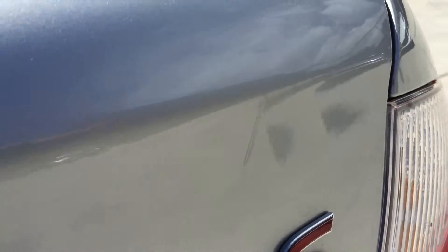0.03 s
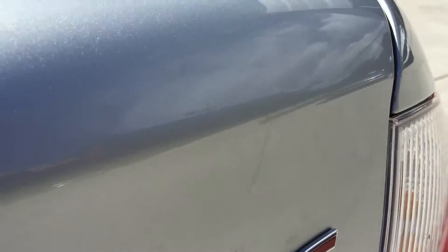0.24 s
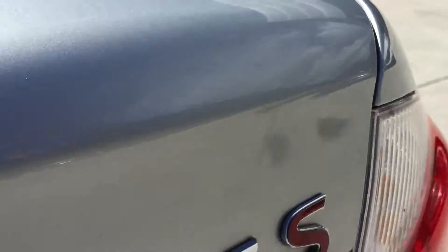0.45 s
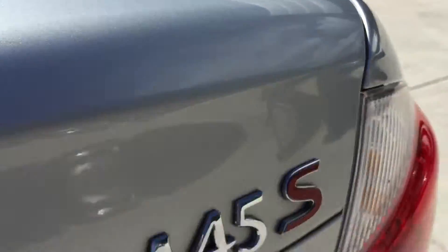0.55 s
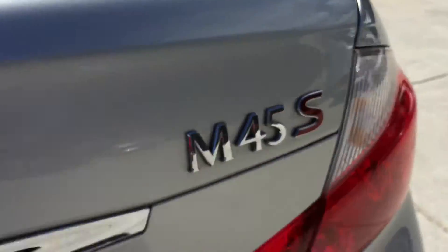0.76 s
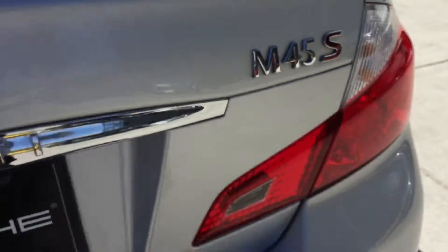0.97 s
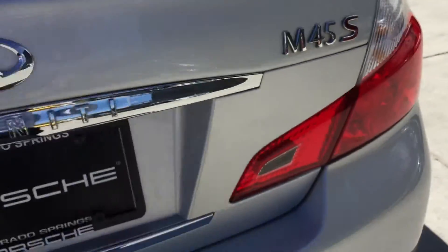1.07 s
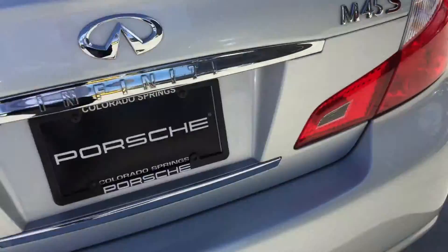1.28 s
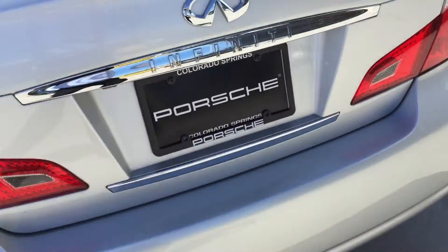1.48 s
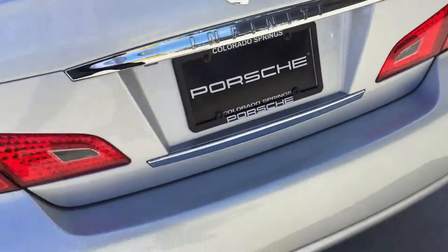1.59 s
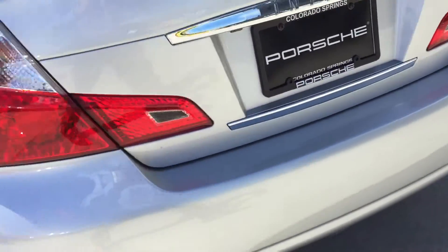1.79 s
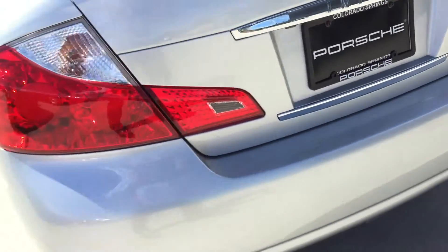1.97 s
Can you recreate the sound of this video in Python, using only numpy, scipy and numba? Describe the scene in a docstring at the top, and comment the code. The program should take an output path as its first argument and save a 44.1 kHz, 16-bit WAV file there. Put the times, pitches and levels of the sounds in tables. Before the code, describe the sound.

Strong gusting wind buffets the microphone outdoors, rumbling and snapping, then eases before a last puff

```python
"""Two seconds of wind buffeting a microphone in an open car park, over smooth filtered-noise traffic.
Strong gusts open at once: low-passed eddy noise rumbles, and faster air opens the treble of each puff.
Short whips of air snap throughout; a tick of shoe grit comes before the thuds that crowd around 1 s.
Then the wind eases, with more ticks and noise scuffs, until a last sharp whip and puff near 1.9 s.
Gain control ducks the quiet sounds under the gusts."""
import sys
import numpy as np
from scipy import signal
from scipy.fft import rfft, irfft
from scipy.io import wavfile
from scipy.ndimage import uniform_filter1d
from numba import njit

SR = 44100
rng = np.random.default_rng(int(sys.argv[2]) if len(sys.argv) > 2 else 0)


def natural_amplitude(level_db):
    """Convert a level in decibels to a linear amplitude factor, elementwise."""
    exponent = np.asarray(level_db, float) / 20
    return 10 ** exponent


def transcribe(u):
    """Save the signal u as a 16-bit wav file named by the first command-line argument.

    u: samples, shape (n,) or (channels, n), limited to [-1, 1]; the rate is SR.
    q: integer samples, one column per channel.
    """
    v = np.clip(np.atleast_2d(u).T, -1, 1)
    q = np.round(v * 32767).astype(np.int16)
    wavfile.write(sys.argv[1], SR, q)


N = 89522
T = np.arange(N) / SR  # seconds


def level(x, db):
    """Set the rms in dB."""
    return x * natural_amplitude(db) / np.sqrt(np.mean(x ** 2))


def coloured(points):
    """Noise of rms 1, shaped by a (Hz, relative dB) spectrum."""
    hz, db = np.array(points, float).T
    bin_hz = np.maximum(np.arange(N // 2 + 1) * SR / N, 1)
    curve_db = np.interp(np.log(bin_hz), np.log(hz), db)
    return level(irfft(rfft(rng.standard_normal(N)) * natural_amplitude(curve_db), N), 0)


def walk(rate_hz):
    """Random drift through rate_hz new values a second, smoothed; spread near 1."""
    knots = rng.standard_normal(1000)
    drift = np.interp(T * rate_hz, np.arange(len(knots)), knots)
    return 1.118 * uniform_filter1d(drift, int(SR / rate_hz / 2) + 1)


def highpass(x, order, hz):
    """Butterworth bass cut."""
    return signal.sosfilt(signal.butter(order, hz, "high", fs=SR, output="sos"), x)


@njit
def soften(x, hz, order):
    """A chain of one-pole low-passes with a moving corner."""
    y, state = np.empty(len(x)), np.zeros(order)
    for i in range(len(x)):
        a, v = 1 - np.exp(-2 * np.pi * hz[i] / SR), x[i]
        for k in range(order):
            state[k] += a * (v - state[k])
            v = state[k]
        y[i] = v
    return y


@njit
def ring(x, hz, width):
    """State-variable band-pass with a moving centre; width is bandwidth over centre."""
    y, band, low = np.empty(len(x)), 0., 0.
    for i in range(len(x)):
        g = np.tan(np.pi * hz[i] / SR)
        v = (band + g * (x[i] - low)) / (1 + g * (g + width))
        band, low, y[i] = 2 * v - band, low + 2 * g * v, width * v
    return y


@njit
def follow(x, up, down, start):
    """Envelope with separate rise and fall rates per sample."""
    y, e = np.empty(len(x)), start
    for i in range(len(x)):
        e += (x[i] - e) * (up if x[i] > e else down)
        y[i] = e
    return y


# Gusts at the port. Each row: time in seconds, level in dB before WIND_DB,
# air speed in m/s before flutter and whips.
GUSTS = [(0, -17.5, 13.3), (.02, -11, 3), (.048, -14, 7.9), (.064, -6, 5.96), (.10, -11, 9.9),
         (.125, -7.5, 3.7), (.165, -14.5, 5.8), (.19, -16.5, 9.36), (.25, -13.5, 7.45), (.275, -11.5, 8.4),
         (.31, -14.5, 7.96), (.36, -18.5, 10.7), (.40, -15, 8), (.47, -19, 8.04), (.51, -13, 7.37),
         (.57, -14.5, 8.8), (.585, -15, 11.13), (0.633, -11, 10.3), (.655, -13, 11.1), (.688, -20.5, 11.9),
         (.70, -9, 6.6), (.725, -15, 2.7), (.77, -21.5, 9), (.80, -19.5, 3), (.85, -23.5, 2.86),
         (.89, -33, 3.7), (.903, -24, 3.4), (.91, -6.5, 6.9), (.93, -11.5, 7), (.97, -21, 3.4),
         (.985, -7, 11), (1.0, -29, 8.9), (1.015, -15, 9.1), (1.035, -9.5, 4.97), (1.065, -26, 6.7),
         (1.09, -7, 8.05), (1.11, -6, 5.5), (1.14, -13.5, 8.5), (1.168, -23.5, 8), (1.19, -23, 2.6),
         (1.225, -21.5, 2.2), (1.26, -26.5, 3.4), (1.31, -23, 1.75), (1.34, -22, 2.66), (1.39, -33.5, 4),
         (1.445, -17.5, 2.47), (1.48, -31.5, 3.6), (1.535, -12, 6.54), (1.56, -30, 5.6), (1.6, -28, 2),
         (1.655, -16.5, 4.26), (1.7, -28.5, 1.74), (1.78, -26, 2.27), (1.86, -23, 0.83), (1.90, -23, 3.75),
         (1.935, -13, 5.93), (1.97, -16, 4.1), (2.0, -23.5, 3.4), (2.03, -21.5, 6.9)]
# Fast turbulence on the gusts. Each row: new values per second in Hz, speed swing in octaves,
# level swing in dB.
TURBULENCE = [(24.26, 0.092, 1.79), (89.735, 0.19, -0.5), (299.4, 0.23, 2.5)]
WIND_DB = 7.5
KNEE_HZ, KNEE_M_S = 1487, 10.21  # smallest-eddy corner at this air speed, rising in step with it


def gusts():
    """Air speed in octaves over KNEE_M_S, gust level and flutter in dB: turbulence sways both."""
    s, db, speed = np.array(GUSTS, float).T
    octaves = np.log2(np.maximum(np.interp(T, s, speed), .5) / KNEE_M_S)
    gust_db = np.interp(T, s, db) + WIND_DB
    flutter_db = 0
    for rate, swing, swing_db in TURBULENCE:
        sway = walk(rate)
        octaves = octaves + swing * sway
        flutter_db = flutter_db + swing_db * (0.2 * sway + 1.17 * walk(rate))  # mostly independent
    return octaves, gust_db, flutter_db


# Sudden whips of fast air. Each row: start in seconds, strength in dB, length in seconds
# (time constant of the Gaussian fall).
WHIP_TIMES = [(.052, -24, 0.0015), (.0635, -2.5, 0.0034), (0.066, -5, 0.011), (.090, -21.5, 0.0053),
              (0.182, -16, 0.0057), (.212, -10, 0.0013), (.269, -9, .003), (.305, -19.5, 0.0028),
              (.327, -15, 0.0024), (.354, -7, 0.0017), (.412, -25, 0.0018), (.434, -23, .005),
              (.492, -22.5, 0.0064), (.551, -25, 0.0011), (.582, -18, 0.0087), (.619, -22, 0.0046),
              (.640, -23.5, 0.0034), (.655, -22, 0.0012), (0.687, -2, 0.0017), (.735, -21.5, 0.0098),
              (.760, -22.5, 0.002), (.823, -22, .006), (.863, -14.5, 0.013), (.908, -14, 0.0055),
              (.918, -11.5, 0.0033), (.988, -23, 0.002), (1.030, -24.5, 0.0014), (1.075, -12, 0.0035),
              (1.092, 0.5, 0.0034), (1.123, -7.5, 0.0026), (1.135, -17.5, 0.0048), (1.164, -31.5, 0.0026),
              (1.22, -12, 0.0085), (1.332, -23.5, 0.0063), (1.524, -38.5, 0.0066), (1.645, -27, 0.0093),
              (1.914, -2, 0.0027), (1.934, -30.5, 0.0015)]
WHIP_REF_DB, WHIP_DB_PER_OCT = -35.5, 20  # strength that adds no speed, strength per added octave
WHIP_RISE_S = 0.00078
SNAP_DB = 2  # pressure jump over the whip strength, before its delay and decay


def whips():
    """Brief leaps in air speed, in octaves, each with a pressure snap of random sign."""
    leap, snaps = np.zeros(N), np.zeros(N)
    for (at, whip_db, length), sign in zip(WHIP_TIMES, np.sign(rng.standard_normal(100))):
        u = np.maximum(T - at, 0)
        peak = max(whip_db - WHIP_REF_DB, 0) / WHIP_DB_PER_OCT
        leap += peak * (1 - np.exp(-u / WHIP_RISE_S)) * np.exp(-(u / length) ** 2)
        # the snap enters one rise time late, already decaying
        snaps += sign * natural_amplitude(whip_db + SNAP_DB) * (T > at + WHIP_RISE_S) * np.exp(-u / WHIP_RISE_S)
    return leap, snaps


# Eddy spectrum before the moving corner. Each row: frequency in Hz, relative density in dB per Hz.
EDDY_SPECTRUM = [(20, 0.5), (60, 3.5), (150, 2), (400, -6.5), (1200, -13), (5000, -19)]
WHIP_GAIN_DB_PER_OCT = 2.5
RUMBLE_FLUTTER = 0.74  # share of the level flutter that the large eddies feel
SHED_DB, SHED_DB_PER_OCT = -2.5, 9.5  # rim vortices: level, growth with speed
SHED_RATIO, SHED_WIDTH = 0.43, 0.74  # band centre over the corner of the slowed speed, width over centre
SHED_SMOOTH_S = 0.013  # vortices follow the speed sluggishly


def wind():
    """Eddies swept over the port rumble and its rim sheds vortices; faster air raises their corner."""
    octaves, gust_db, flutter_db = gusts()
    leap, snaps = whips()
    octaves = octaves + leap
    gust_db = gust_db + WHIP_GAIN_DB_PER_OCT * leap
    corner_hz = np.clip(KNEE_HZ * 2 ** octaves, 80, 12000)
    rumble = soften(coloured(EDDY_SPECTRUM), corner_hz, order=6)
    rumble = natural_amplitude(gust_db + RUMBLE_FLUTTER * flutter_db) * rumble
    slow = uniform_filter1d(octaves, int(SHED_SMOOTH_S * SR) + 1)
    # dividing by the root of the corner offsets the power a wider band lets through
    rim = soften(rng.standard_normal(N) / np.sqrt(corner_hz / SR), corner_hz, order=6)
    rim = ring(rim, SHED_RATIO * KNEE_HZ * 2 ** np.minimum(slow, 2), SHED_WIDTH)
    rim = natural_amplitude(gust_db + flutter_db + SHED_DB + SHED_DB_PER_OCT * slow) * rim
    return rumble + rim + soften(snaps, corner_hz, order=6)


# Grit under a shoe. Each row: start in seconds, relative level in dB.
GRIT = [(.685, -48), (.9815, -45), (.990, -50.5), (1.352, -50.5), (1.3895, -47.5)]


def ticks():
    """Dry ticks of grit: noise bursts with a 0.3 ms decay, thinned by a bass cut."""
    env = sum(natural_amplitude(db) * np.exp(-np.maximum(T - at, 0) / .0003) * (T >= at) for at, db in GRIT)
    return highpass(2.5 * env * rng.standard_normal(N), 2, 1500)


# Shoe scuffs. Each row: start in seconds, length in seconds, peak level in dB before flicker.
SCRAPES = [(0.904, 0.15, -57.5), (1.708, 0.077, -65.5), (1.90, .048, -50)]
# Scuff spectrum. Each row: frequency in Hz, relative density in dB per Hz.
SCRAPE_SPECTRUM = [(1800, -28.5), (2800, 6.5), (3800, -15), (5300, -7), (6500, -8), (8200, -5.5),
                   (11500, -12), (13500, -15.5), (15500, -23.5)]


def scuffs():
    """Short scraping hisses that swell and fade, with a rough flicker in level."""
    rub = sum(natural_amplitude(db) * np.sin(np.pi * np.clip((T - at) / length, 0, 1)) ** 2
              for at, length, db in SCRAPES)
    return rub * natural_amplitude(2.5 * walk(220)) * coloured(SCRAPE_SPECTRUM)


# Far traffic spectrum. Each row: frequency in Hz, relative density in dB per Hz.
ROAD_SPECTRUM = [(150, -28), (300, 0), (600, -0.5), (950, 1.5), (1500, -5), (2200, -13.5), (3000, -22),
                 (4200, -32.5), (6000, -33), (10000, -45), (15500, -58.5)]


def traffic():
    """Smooth far road hiss, drifting slowly around -48 dB."""
    return natural_amplitude(-48 + 3.5 * walk(2)) * coloured(ROAD_SPECTRUM)


def scene():
    """Wind on the port over the near shoes and the far traffic."""
    return (wind() + ticks() + scuffs() + traffic())[None]


def top_cut(x):
    """Nothing passes above the cut-off."""
    return signal.sosfilt(signal.butter(12, 15800, fs=SR, output="sos"), x)


MIC_LOW_HZ = 55
AGC_DB, AGC_RATIO = -25, 1.518  # envelope left unchanged before make-up, compression ratio
AGC_ATTACK_S, AGC_RELEASE_S = 0.006, 0.92
MAKEUP_DB = 6
CEILING = .93  # soft overload limit, full scale = 1
HISS_DB = -82


def record(dry):
    """Bass cut, gain control, soft overload and electronic hiss."""
    x = highpass(dry[0], 3, MIC_LOW_HZ)
    envelope = follow(np.abs(x), 1 / (AGC_ATTACK_S * SR), 1 / (AGC_RELEASE_S * SR), 0.88)
    x = x * (natural_amplitude(AGC_DB) / envelope) ** (1 - 1 / AGC_RATIO) * natural_amplitude(MAKEUP_DB)
    x = x / (1 + np.abs(x / CEILING) ** 4) ** (1 / 4)
    x = x + natural_amplitude(HISS_DB) * rng.standard_normal(N)
    return top_cut(x[None])


dry = scene()
out = record(dry)
transcribe(out)
```